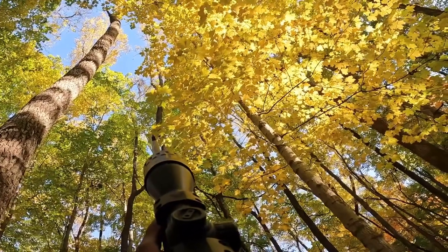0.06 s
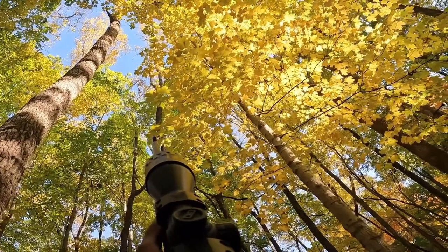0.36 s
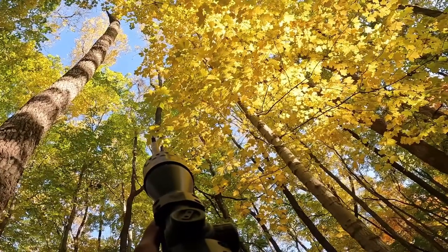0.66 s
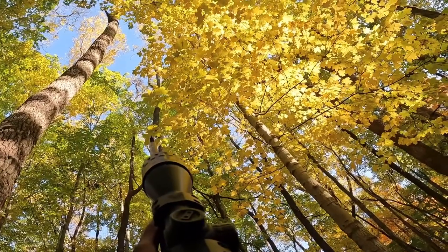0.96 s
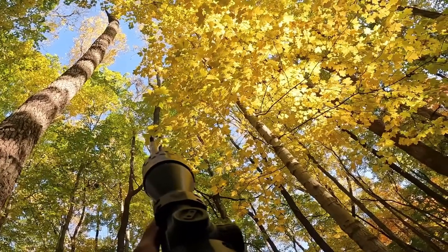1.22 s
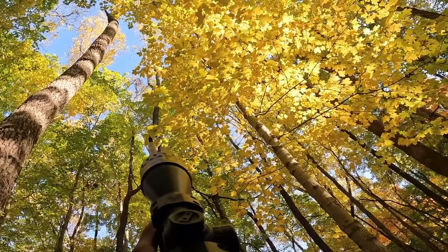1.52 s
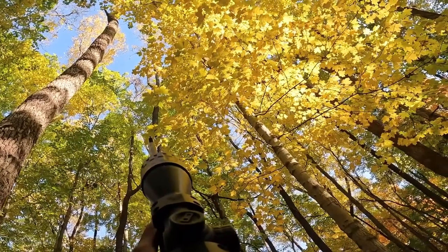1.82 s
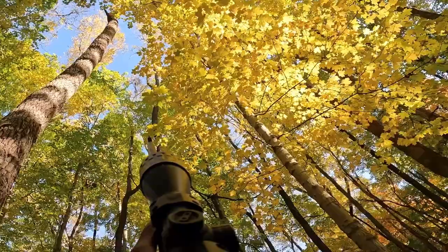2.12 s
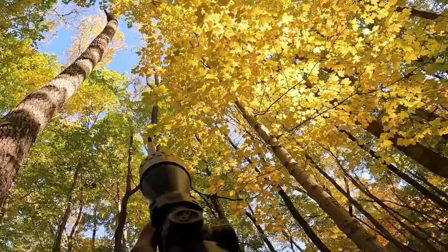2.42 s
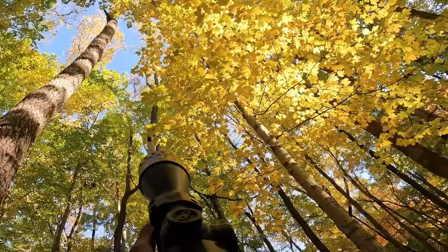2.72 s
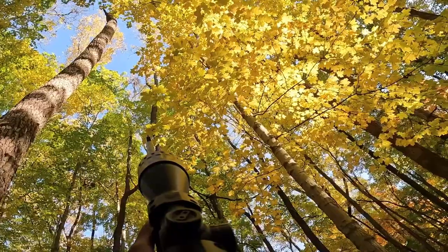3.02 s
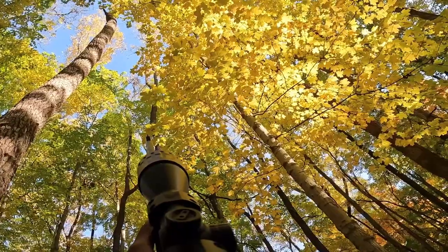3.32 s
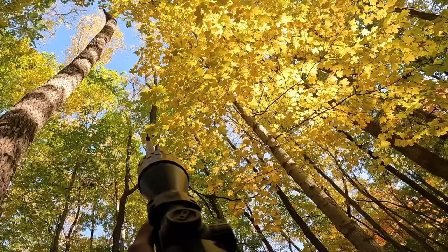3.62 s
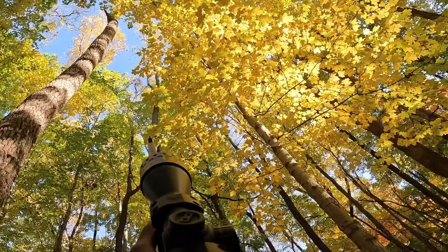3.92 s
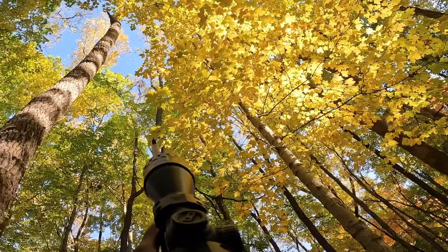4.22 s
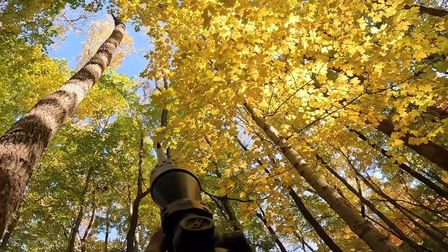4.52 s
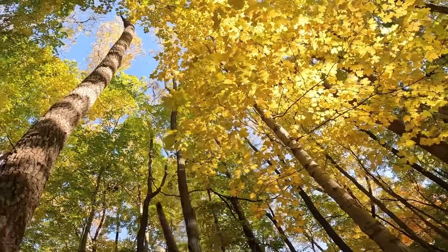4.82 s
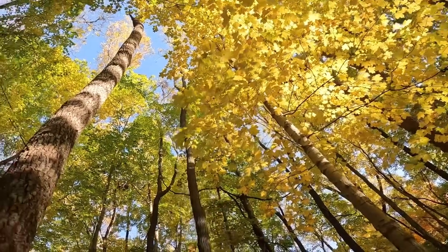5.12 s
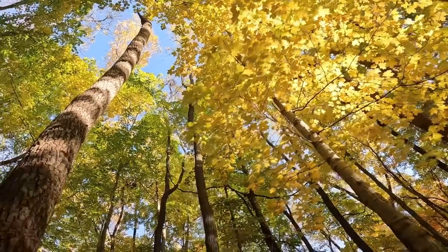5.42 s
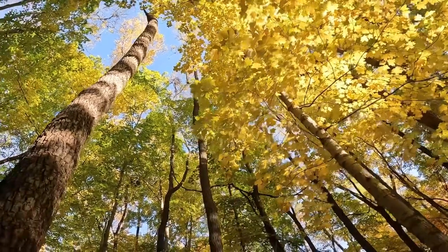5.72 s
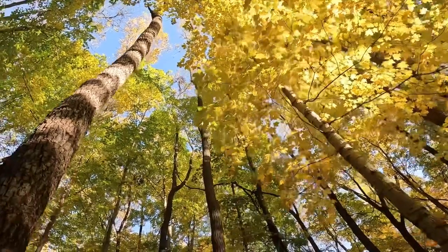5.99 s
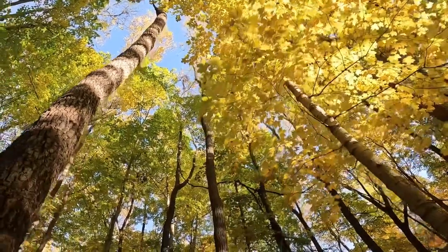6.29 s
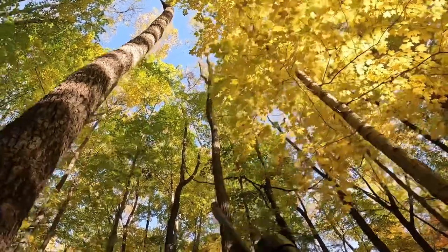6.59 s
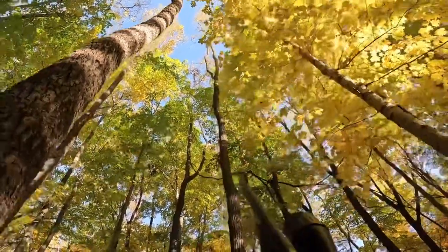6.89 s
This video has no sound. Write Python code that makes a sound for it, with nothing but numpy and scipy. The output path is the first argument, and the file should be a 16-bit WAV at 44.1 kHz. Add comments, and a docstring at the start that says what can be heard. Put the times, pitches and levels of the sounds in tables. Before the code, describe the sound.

A single sharp rifle shot, heard from right behind the gun, breaks a calm of faint bird calls, leaves and a far engine. The blast jolts the microphone and leaves a long, dulling forest echo. About a second later the rifle's action is worked in a quick run of close metallic clicks and clacks. Sleeves rustle, and a few taps and a low puff of wind hit the microphone.

```python
"""A rifle shot in autumn woods, from a stereo camera microphone right behind the gun; trunks and leaves
throw back a long, dulling echo. Before the shot birds call, the rifle clicks softly, something creaks
close by and a far engine drones. Afterwards the steel action is worked, clothes rustle and the camera
is jostled while its gain control recovers."""
import sys
import numpy as np
from scipy import signal
from scipy.fft import rfft, irfft
from scipy.io import wavfile
from scipy.ndimage import uniform_filter1d

SR = 44100
rng = np.random.default_rng(int(sys.argv[2]) if len(sys.argv) > 2 else 0)


def bounce(signal):
    """Save signal as a 16-bit WAV file at the path given by the first command-line argument."""
    frames = np.transpose(np.atleast_2d(signal))
    limited = np.clip(frames, -1, 1)
    pcm = np.round(limited * 32767).astype(np.int16)
    wavfile.write(sys.argv[1], SR, pcm)


N = 315315
TIME = np.arange(N) / SR
AGE = TIME[:SR // 3]  # time within one short sound
LEAD_S = .03  # room for a crack to build up

# stereo width of close sounds and of returns from the trees: f/Hz, side minus mid/dB
NEAR_WIDTH = [(600, -14), (5000, -13), (12000, -11)]
ECHO_WIDTH = [(600, -13), (1400, -6), (3000, -9.5), (7000, -15), (15000, -10)]


def undb(db):
    """Decibels to gain."""
    return 10 ** (np.asarray(db) / 20)


def unit(x):
    """Scale to rms 1."""
    return x / np.sqrt(np.mean(x ** 2))


def add(out, s, sound):
    """Mix a sound in at time s."""
    i = max(int(s * SR), 0)
    out[..., i:i + sound.shape[-1]] += sound[..., :N - i]


def fade(t60):
    """Exponential decay after a blow."""
    return np.exp(-np.log(1000) * AGE / max(t60, 1e-3))


def swell(middle_s, half_s):
    """A smooth rise and fall around a moment."""
    return np.exp(-.5 * ((TIME - middle_s) / half_s) ** 2)


def swells(table):
    """The joint envelope of overlapping movements."""
    return np.sqrt(sum((undb(db) * swell(s, half_s)) ** 2 for s, half_s, db in table))


def walk(rate):
    """Random drift of rms 1, with about `rate` turns a second."""
    hold = int(SR / rate)
    steps = np.repeat(rng.standard_normal(N // hold + 1), hold)
    return unit(uniform_filter1d(uniform_filter1d(steps, hold), hold)[:N])


def colour(x, spectrum):
    """Filter by a list of (f/Hz, level/dB) points."""
    hz, db = np.transpose(spectrum)
    bins = np.maximum(np.arange(x.shape[-1] // 2 + 1) * SR / x.shape[-1], 1)
    return irfft(rfft(x) * undb(np.interp(np.log(bins), np.log(hz), db)), x.shape[-1])


def tilted(table, corners_hz, lifts_db):
    """A spectrum or a set of modes with some regions lifted."""
    return [(hz, db + np.interp(np.log(hz), np.log(corners_hz), lifts_db), *rest)
            for hz, db, *rest in table]


def octaves(x):
    """Split into overlapping octave bands that sum to the whole: (centre/Hz, band)."""
    size = x.shape[-1]
    octave = np.log2(np.clip(np.arange(size // 2 + 1) * SR / size, 125, 16000))
    spectrum = rfft(x)
    return [(2. ** k, irfft(spectrum * np.maximum(1 - abs(octave - k), 0), size)) for k in range(7, 15)]


def noise(spectrum, width, envelope, grain_db=0):
    """Stereo noise that follows an envelope and keeps its energy; grain_db makes grains stand out."""
    size = len(envelope)
    mid, side = envelope * rng.standard_normal((2, size)) * undb(grain_db * rng.exponential(size=size))
    side = colour(side, width)
    return unit(colour(np.array([mid + side, mid - side]), spectrum)) * np.sqrt(np.mean(envelope ** 2))


def burst(spectrum, t60, rise, grain_db=0):
    """A close, noisy crack that peaks LEAD_S into the sound, after a brief build-up."""
    decay = np.interp(AGE - LEAD_S, AGE, fade(t60))
    build_up = np.interp(LEAD_S - AGE, AGE, fade(rise))
    return noise(spectrum, NEAR_WIDTH, decay * build_up, grain_db)


def ring(modes, scatter_db):
    """Struck metal; every blow shares its force differently among the modes and detunes them a little."""
    out = np.zeros(len(AGE))
    for hz, db, t60 in modes:
        force, polarity, detune = rng.standard_normal(3)
        tone = np.sign(polarity) * np.sin(2 * np.pi * hz * (1 + .025 * detune) * AGE)
        out += undb(db + scatter_db * force) * tone * fade(t60)
    return out * np.minimum(AGE / 0.0014, 1)


def woods(x, t60, dulling):
    """Countless trunks scatter a sound back; the treble dies first."""
    scatter = noise([(100, 1.5), (1500, -6.5), (4000, 1.5), (14000, 2.0)], ECHO_WIDTH, np.ones(SR))
    response = sum(band * np.exp(-np.log(1000) * TIME[:SR] / t60 * (1 + dulling * hz / SR))
                   for hz, band in octaves(scatter))
    return signal.fftconvolve(np.atleast_2d(x), unit(response) / np.sqrt(SR), axes=1)[:, :N]


def leaves():
    """A soft, wide hush of leaves all around the microphone."""
    hush = [(120, -27), (200, 2), (268, -6.5), (500, -17), (735, -26), (1370, -20), (2210, -29),
            (3970, -33.5), (5630, -31.5), (7540, -36), (9400, -50), (16000, -63)]  # spectrum: f/Hz, level/dB
    width = [(100, -7.5), (400, -3.5), (2000, -3.5), (8000, -5)]  # stereo width: f/Hz, side minus mid/dB
    return noise(hush, width, undb(-62.5 + 0.12 * walk(3.9)))


def engine():
    """A far engine comes up out of the hush, slowly gaining speed and level and wavering on the way."""
    orders = [0.5, -18, -27.5, -43.5, -37.5, -38.5, -36.5]  # multiples of the firing rate, from the first up: level/dB
    firing_hz = 69.8 + 0.082 * TIME ** 2
    db = -47 + 0.85 * TIME - 11 * np.exp(-TIME / 0.56)
    phase = 2 * np.pi * np.cumsum(firing_hz * (1 + .005 * walk(13))) / SR
    return sum(undb(db + order_db + 0.5 * walk(11)) * np.sqrt(2) * np.sin(k * phase)
               for k, order_db in enumerate(orders, 1))


def note(length, contour_hz, harmonics_db, rasp):
    """One bird note gliding through pitches evenly spaced in time; rasp shakes the pitch."""
    u = np.linspace(0, 1, int(length * SR))
    shake = 1 + rasp * unit(uniform_filter1d(rng.standard_normal(len(u)), size=60))
    hz = np.interp(u, np.linspace(0, 1, len(contour_hz)), contour_hz)
    phase = 2 * np.pi * np.cumsum(shake * hz) / SR
    tone = sum(undb(db) * np.sin(k * phase) for k, db in enumerate(harmonics_db, 1))
    return np.sqrt(4 * u * (1 - u)) * tone


def birds():
    """A near bird chips; a far woodpecker and trilling whistlers arrive mostly by way of the trees."""
    chips = [(0.331, -58.5), (0.876, -57.5), (1.369, -60.5), (2.107, -58.5), (3.047, -58.5), (3.404, -58.5)]  # downward chips: t/s, relative level/dB
    # whistles: t/s, length/s, start f/Hz, end f/Hz, relative level/dB, rasp/share of the pitch
    whistles = [(.58, .35, 3790, 3780, -83, .008), (1.604, .075, 3970, 3410, -74, .04),
                (1.597, .21, 3150, 2780, -69.5, .035), (2.335, .55, 7900, 7780, -83.5, .008),
                (3.15, .09, 3540, 3110, -71, .03), (3.67, .33, 3640, 3638, -76.5, .009)]
    peeks = [(0, 1553, -68), (0.909, 1543, -60.5), (2.137, 1565, -62.5), (2.687, 1588, -62),
             (3.438, 1625, -64.5)]  # the woodpecker's sharp calls: t/s, f/Hz, relative level/dB
    chip_hz, trill_hz, trill_db = 6280, 21, 4
    near, far = np.zeros((2, N))
    for s, db in chips:
        add(near, s, undb(db - 7) * note(0.026, chip_hz * np.array([1, 1, .9, .77]), [0], rasp=.012))
    for s, length, start_hz, end_hz, db, rasp in whistles:
        add(far, s, undb(db) * note(length, [start_hz, end_hz], [0], rasp))
    far *= undb(trill_db * np.sin(2 * np.pi * trill_hz * TIME))
    arch = np.array([.86, 1, 1.01, .99, .9])
    for s, hz, db in peeks:
        add(far, s, undb(db) * note(0.054, hz * arch, [2, 1.5, -8, -9.5, -15, -23, -27], rasp=.043))
    echoes = undb(1.5) * woods(near, t60=0.68, dulling=2) + woods(far, t60=1.1, dulling=4.4)
    return near + undb(-6.5) * far + echoes


def wind():
    """Air buffets the microphone ports, with a gust as the camera swings."""
    rumble = [(30, 10), (60, 6.5), (110, 1.5), (180, -11.5), (300, -22.5), (600, -59)]  # spectrum: f/Hz, level/dB
    flow = undb(-48.5) + undb(-34.5) * swell(6.87, half_s=.12)
    return noise(rumble, width=[(30, -10.5), (150, -13.0)], envelope=flow * undb(1.8 * walk(6)))


def clothes():
    """Beside the microphone sleeves rustle, and the cloth drags with a bright, uneven zip."""
    # sleeve movements and snags: middle t/s, half length/s, level/dB
    strokes = [(5.848, 0.2, -52), (6.14, 0.16, -52), (6.487, 0.14, -51.5), (6.925, 0.12, -45.5),
               (7.124, 0.046, -52)]
    snags = [(4.765, .012, -57), (6.345, .025, -54), (6.45, 0.036, -55.5), (6.58, 0.049, -58),
             (6.95, .005, -45.5)]
    # their spectra: f/Hz, level/dB
    rustle_colour = [(110, -10), (180, 2.5), (350, -2.5), (525, -4.5), (2700, -16), (7140, -26.5),
                     (16000, -54)]
    snag_colour = [(500, -4), (2500, 1.5), (6000, -6), (8500, -14), (16000, -23)]
    catching = undb(2.5 * walk(90))
    rustle = noise(rustle_colour, NEAR_WIDTH, swells(strokes), grain_db=1)
    drag = noise(snag_colour, NEAR_WIDTH, swells(snags), grain_db=1.5)
    return catching * (rustle + drag)


def creak():
    """Something close, perhaps the sling, slips irregularly as the aim shifts, ringing two resonances."""
    resonances = [(350, 0.5), (600, -34.5), (1250, -14), (1600, 1), (1950, -22), (4000, -47)]  # spectrum: f/Hz, level/dB
    slips_per_s = 2000
    slips = rng.random(N) < slips_per_s / SR
    return undb(-42) * noise(resonances, NEAR_WIDTH, slips * swell(1.245, half_s=.045))


def thump(hz, t60):
    """One mode of the camera's mount, pushed for half a cycle; rocking puts the ports out of step."""
    rock_rad = np.array([[1], [-1]]) * .33 * np.sqrt(90 / hz)
    return np.sin(2 * np.pi * hz * AGE + rock_rad) * fade(t60) * np.minimum(2 * hz * AGE, 1)


def handling():
    """Handling noise: the recoil jolts the camera, it sways in the hand and its housing is knocked."""
    jolts = [(3.9739, -15, 4.5, 0.73), (3.984, 2.5, 1, 1.25), (4.0202, -4.5, -4.5, 2.6),
             (4.045, -22.5, -2, .8)]  # recoil: t/s, level/dB, hardness/dB per octave, damping factor of the grip
    mount_modes = [(32, 2.5, 0.13), (92.6, 15, 0.059), (136, 2, 0.07), (195, 0.5, 0.064), (233.5, 4, .1),
                   (319.2, 3.5, 0.051), (645, 5.5, 0.018), (910, -1, 0.03)]  # the mount's resonances: f/Hz, level/dB, t60/s
    sways = [(1.39, -23.5, 21.4), (6.776, -22.5, 44.2), (6.87, -22.5, 47.4), (6.932, -27, 49)]  # slow pushes: t/s, level at the right port/dB, f/Hz
    knocks = [(6.104, -33.5, 710), (6.428, -34.5, 705), (6.831, -41, 336), (6.973, -24, 550),
              (7.125, -28, 344), (7.143, -29.5, 680)]  # light knocks: t/s, level/dB, f/Hz
    out = np.zeros((2, N))
    for s, db, hardness_db, damping in jolts:
        for hz, mode_db, t60 in mount_modes:
            add(out, s, undb(db + mode_db + hardness_db * np.log2(hz / 250)) * thump(hz, t60 / damping))
    for s, db, hz in sways:
        out += undb([[db - 4], [db]]) * swell(s, half_s=0.011) * np.sin(2 * np.pi * hz * (TIME - s))
    for s, db, hz in knocks:
        add(out, s, undb(db) * thump(hz, t60=0.016))
    return out


def ticks():
    """The rifle's fittings click, something hard taps the camera by its left port; the trees answer."""
    clicks = [(2.247, -51, -28.5), (2.271, -56, -5), (2.396, -60.5, -12), (2.647, -50.5, 4.5)]  # small catches: t/s, level/dB, ring against the click/dB
    click_modes = [(1490, -10, .035), (2282, -1, .12), (2470, 4, .034), (2820, -1, .016), (3310, 0, .032)]  # their resonances: f/Hz, level/dB, t60/s
    taps = [(6.882, -14, 0.0077, .001), (6.884, -26.5, 0.053, 0.036)]  # tap and graze: t/s, level/dB, t60/s, build-up/s
    # spectra of a click, a tap and the tap's shading at the right port: f/Hz, level/dB
    click_colour = [(600, -37), (1300, 6), (3600, -1.5), (7500, -8), (8600, -14), (13000, -26),
                    (16000, -60)]
    tap_colour = [(240, -8), (600, 10), (1460, -9), (3100, 0), (4110, -17), (8000, -10.5), (12500, -6),
                  (16000, -15)]
    tap_shadow = [(6000, -4), (13000, -8)]
    out, tap = np.zeros((2, 2, N))
    for s, db, ring_db in clicks:
        add(out, s - LEAD_S, undb(db) * burst(click_colour, t60=0.067, rise=0.0054))
        add(out, s, undb(db + ring_db) * ring(click_modes, scatter_db=2.5))
    for s, db, t60, rise in taps:
        add(tap, s - LEAD_S, undb(db) * burst(tap_colour, t60, rise))
    out += np.array([tap[0], colour(tap[1], tap_shadow)])
    return out + undb(-13) * woods(out, t60=0.61, dulling=2.6)


def action():
    """Close up, steel parts meet and chatter; receiver and part ring, and the trees return the cracks."""
    # opening and closing: t/s, relative level/dB, edge and body (set the tilt), struck part's f/Hz
    contacts = [(5.269, -31, -6, 5, 1300), (5.381, -21.5, -19, -47, 2510), (5.391, -6.5, -21.5, -16, 1720),
                (5.692, -23, 1, -6, 4500), (5.708, -7.5, -30.5, -18.5, 2940), (5.815, -21.5, -34, -9, 1000),
                (5.872, -32, -23, -25, 2900), (5.89, -21, -17, -14, 3180), (5.915, -9, -11.5, -5, 2960),
                (5.976, -11.5, -32, -15.5, 1670), (6.022, -24, -11, 7, 890), (6.034, -15.5, -19, 0, 1000),
                (6.324, -25, -49, -35, 3110)]
    receiver_modes = [(420, -9.5, 0.078), (687, -8, 0.075), (926, -13.5, 0.11), (1290, -12, 0.061),
                      (1750, -4.5, 0.031), (2194, -6.5, 0.033), (2600, -7, 0.0286), (4070, 5.5, 0.0063)]  # resonances: f/Hz, level/dB, t60/s
    contact_colour = [(300, -11.5), (749, -4.5), (933, 0), (1500, -6), (1940, -9.5), (3000, -5),
                      (3600, -10), (4860, -13.5), (6170, -12), (7680, -19.5), (8420, -32), (13300, -34.5),
                      (16000, -48.5)]  # steel on steel: f/Hz, level/dB
    part_db, part_t60 = 2.5, .026
    cracks, rings = np.zeros((2, 2, N))
    for s, db, edge, body, part_hz in contacts:
        # hard contacts are brighter, heavy ones have more body
        corners_hz, lifts_db = [700, 2000, 5500], [0.59 * (body + 4.0), 0, 0.57 * (edge + 7.5)]
        spectrum = tilted(contact_colour, corners_hz, lifts_db)
        contact = undb(-6) * burst(spectrum, t60=0.011, rise=0.004)
        chatter = undb(-13) * burst(spectrum, t60=0.047, rise=0.035, grain_db=4)
        add(cracks, s + 0.000965 - LEAD_S, undb(db) * (contact + chatter))
        modes = tilted(receiver_modes, corners_hz, lifts_db) + [(part_hz, part_db, part_t60)]
        add(rings, s + .001, undb(db - 12) * ring(modes, scatter_db=2))
    return cracks + rings + undb(-13) * woods(cracks, t60=0.5, dulling=0.48)


def shot_echo(shot_s):
    """The nearest trees slap back brightly; ever further ones follow, each duller than the last."""
    # spectra of the slap and of the long wash: f/Hz, level/dB
    slap_colour = [(300, -6), (600, -22.5), (2200, -9), (3400, 2), (15000, -62.5)]
    wash_colour = [(150, -26), (400, -18), (800, -11), (1400, -6), (3300, 0.5), (5000, -3), (7200, -8),
                   (8500, -19), (10500, -21), (13800, -33.5), (15000, -63.5)]
    waves = [(0.139, 3.5), (.25, 3.5)]  # stronger returns from the canopy and a further stand: delay/s, lift/dB
    rise_s, fall_s = 0.01755, 0.054
    hold_s, fall_power = 0.31, 5.88  # the wash holds, then falls as a power of its age
    out = undb(-12.5) * noise(slap_colour, ECHO_WIDTH, swell(shot_s + .111, half_s=.011))
    age = np.maximum(TIME - shot_s, 0)
    waves_db = sum(db * swell(shot_s + delay, np.where(age < delay, rise_s, fall_s))
                   for delay, db in waves)
    wash_db = -11.5 + waves_db - 10 * np.log10(1 + (age / hold_s) ** fall_power)
    loss_db_per_root_khz = np.minimum(-4.5 + 33.5 * age, 29.5)  # tilts about 1 kHz
    # single trunks stand out of the wash
    scatter = noise(wash_colour, ECHO_WIDTH, undb(.9 * walk(130)), grain_db=1.5)
    for hz, band in octaves(scatter):
        out += band * undb(wash_db - loss_db_per_root_khz * (np.sqrt(hz / 1000) - 1)) * (age > 0)
    return out


def shot():
    """Just ahead of the microphone: an N-shaped shock front in a cluster of cracks, then the echo."""
    # a faint lead-in hiss, then lock, muzzle blast and the nearest surfaces:
    # t/s, level/dB, t60/s, lift below 1 kHz/dB
    cracks = [(3.952, -41, 0.045, 1.5), (3.963, -24, 0.034, 7.5), (3.9736, -14.5, 0.026, -1.5),
              (3.9764, 0, 0.0099, -1.5), (3.9817, 0, 0.018, 1.5), (3.9845, 16, 0.0059, 3),
              (3.988, 11, 0.0039, -8.5), (3.9965, 0, 0.028, -9), (4.0135, -1.5, 0.048, -16.5),
              (4.019, 5, 0.019, -14), (4.03, -14.5, 0.38, -4.5)]
    crack_colour = [(88, -29.5), (150, -1.5), (923, -2), (1210, -17), (1450, -2), (1940, -10.5),
                    (2220, -4.5), (3420, 2.5), (5050, -6.5), (6770, -1.5), (8900, -20.5), (10400, -12),
                    (16000, -36)]  # spectrum: f/Hz, level/dB
    shot_s, shock_s, spring_hz = 3.9845, 0.00018, 895
    out = np.zeros((2, N))
    add(out, shot_s, undb(19) * (1 - 2 * AGE / shock_s) * (AGE < shock_s))
    for s, db, t60, body_db in cracks:
        spectrum = tilted(crack_colour, [1000, 2000], [body_db, 0])
        add(out, s - LEAD_S, undb(db) * burst(spectrum, t60, rise=0.00066))
    # the lock's spring sings between the fall of the striker and the blast
    out += undb(-24) * swell(3.977, half_s=0.0065) * np.sin(2 * np.pi * spring_hz * TIME)
    return (out + shot_echo(shot_s)) * undb([[.5], [-.5]])  # a touch to the left


def scene():
    """Everything that reaches the microphone's two ports."""
    return (shot() + action() + ticks() + handling() + clothes() + wind()
            + birds() + creak() + engine() + leaves())


def narrow(x):
    """The stereo image narrows after the shot, most of all in the bass."""
    narrowing = [(4.1, -74), (4.6, 56), (6.4, 76), (6.8, -17.5)]  # t/s, loss of side at 125 Hz/dB (none below zero)
    mid, side = (x[0] + x[1]) / 2, (x[0] - x[1]) / 2
    loss_db = np.maximum(np.interp(TIME, *np.transpose(narrowing)), 0)
    side = sum(band * undb(-loss_db * np.interp(np.log(hz), np.log([125, 6000]), [1, 0]))
               for hz, band in octaves(side))
    return np.array([mid + side, mid - side])


def gain_control(x, threshold_db, recovery_db_per_s, window_s):
    """The gain drops at once by the excess over the threshold and creeps back."""
    power = uniform_filter1d(np.mean(x ** 2, axis=0), int(window_s * SR))
    excess_db = np.maximum(10 * np.log10(np.maximum(power, 1e-12)) - threshold_db, 0)
    ramp = recovery_db_per_s * TIME
    return x * undb(ramp - np.maximum.accumulate(excess_db + ramp))


def record(dry):
    """The image narrows; the camera ducks under the shot, clips its peaks and cuts the top."""
    ducked = gain_control(narrow(dry), threshold_db=-11.5, recovery_db_per_s=10.5, window_s=0.019)
    top_cut = signal.ellip(8, .2, 70, 16200, fs=SR, output="sos")
    return signal.sosfilt(top_cut, np.clip(ducked, -.9, .9))


dry = scene()
out = record(dry)
bounce(out)
```